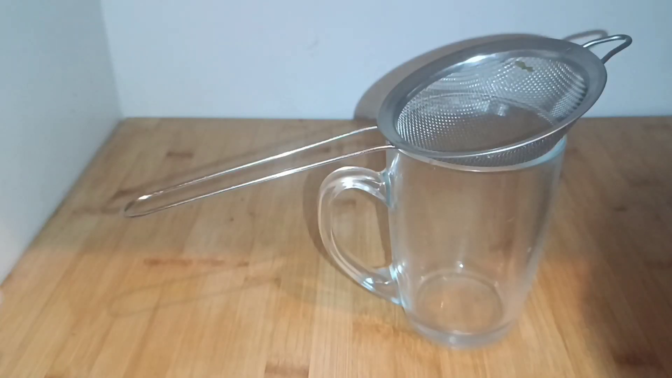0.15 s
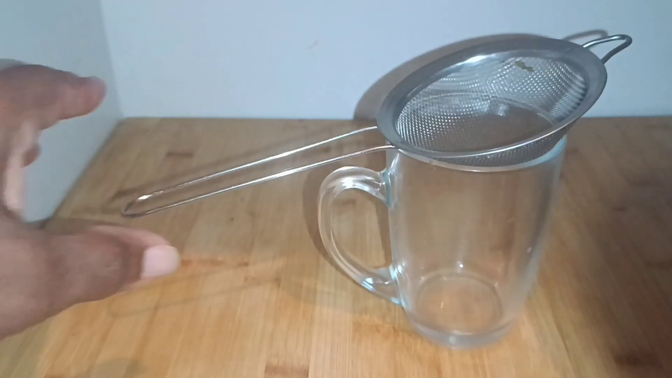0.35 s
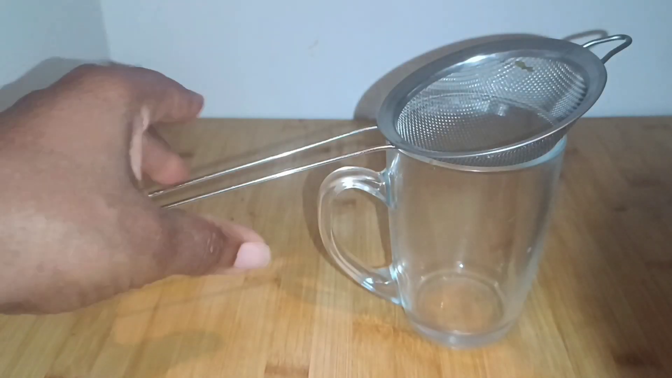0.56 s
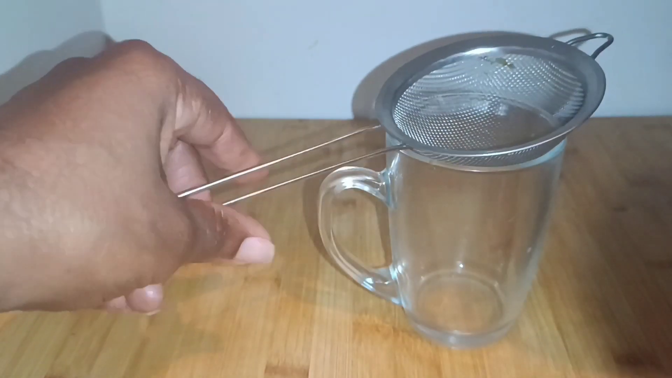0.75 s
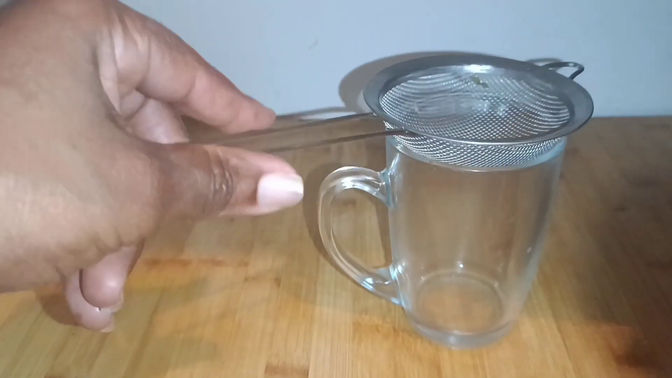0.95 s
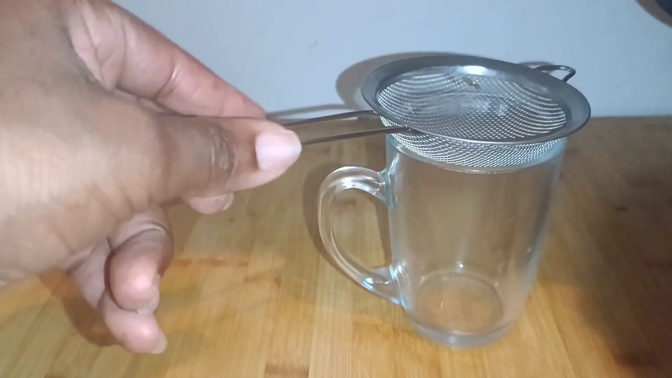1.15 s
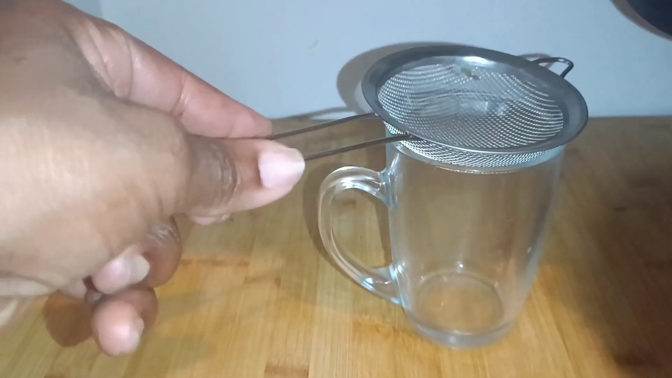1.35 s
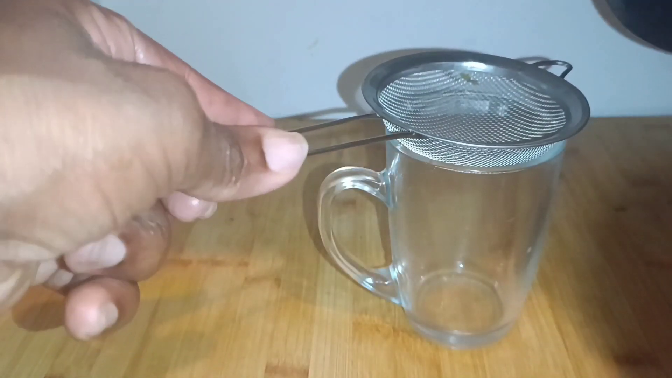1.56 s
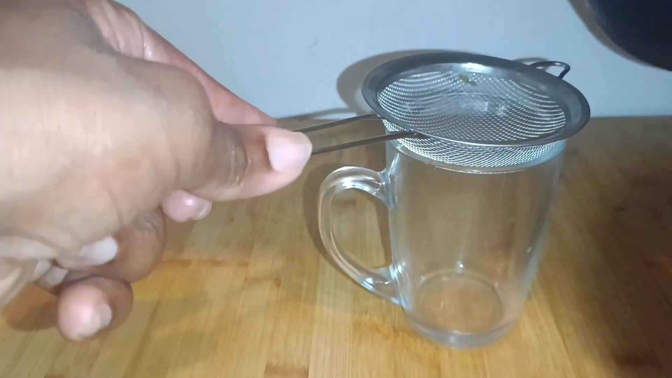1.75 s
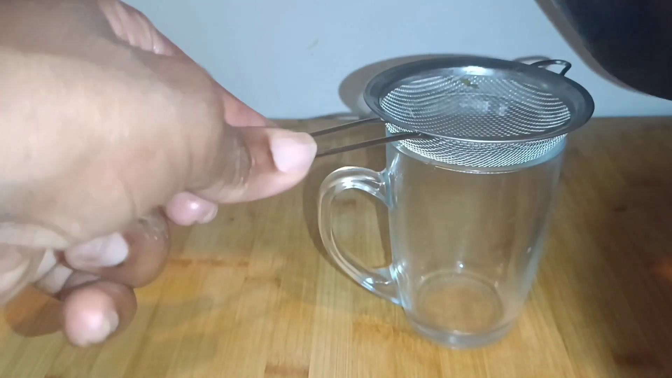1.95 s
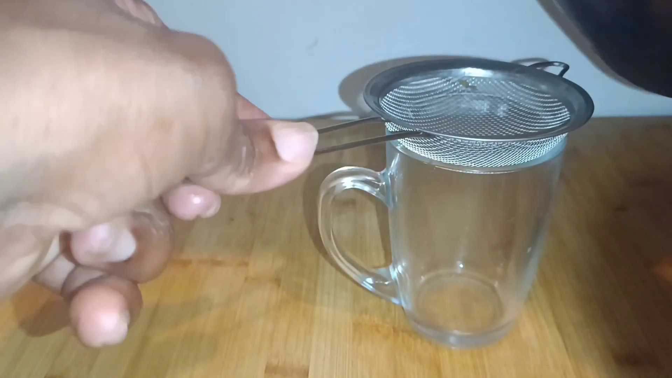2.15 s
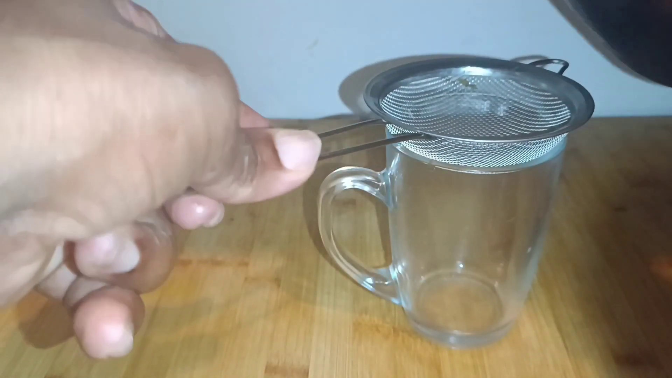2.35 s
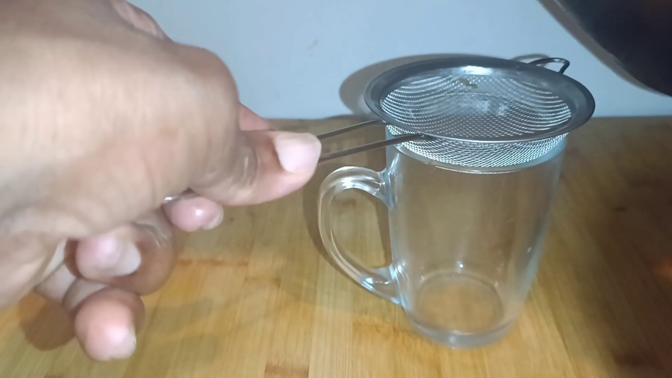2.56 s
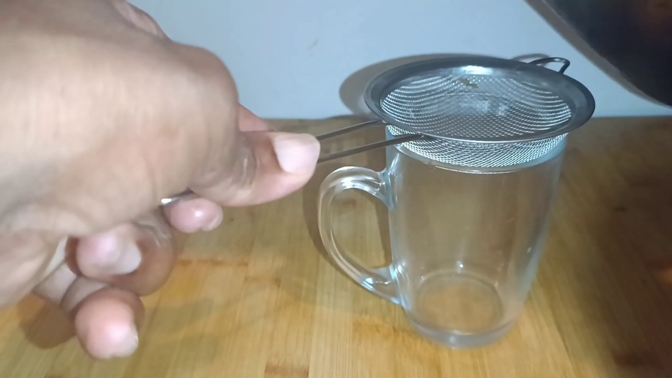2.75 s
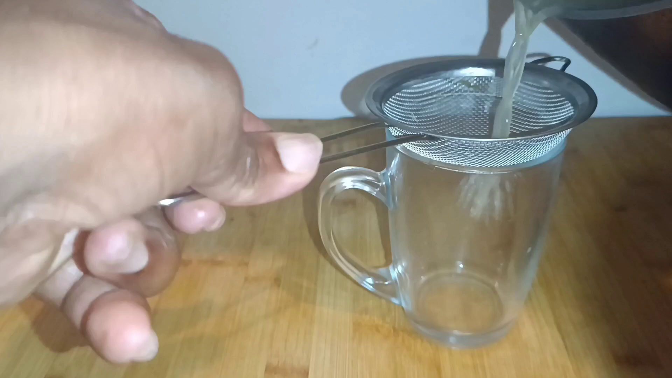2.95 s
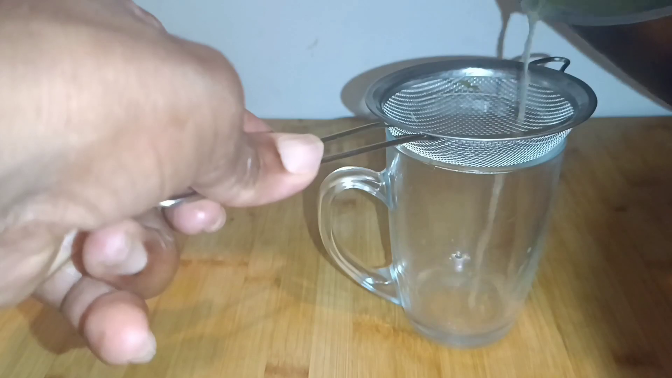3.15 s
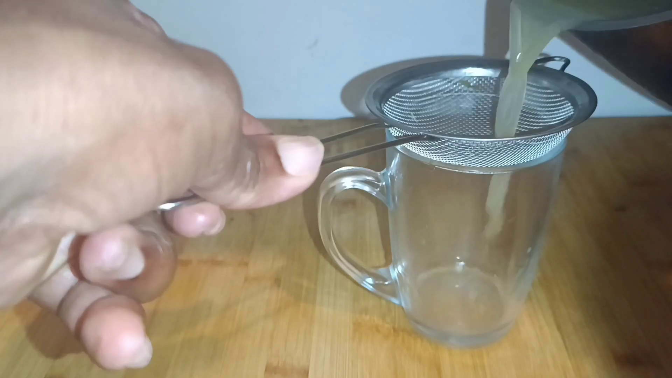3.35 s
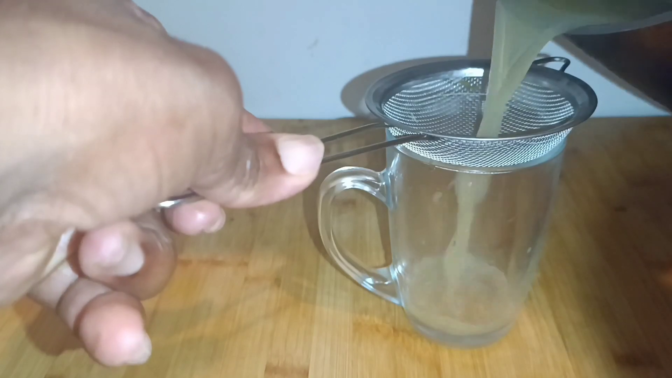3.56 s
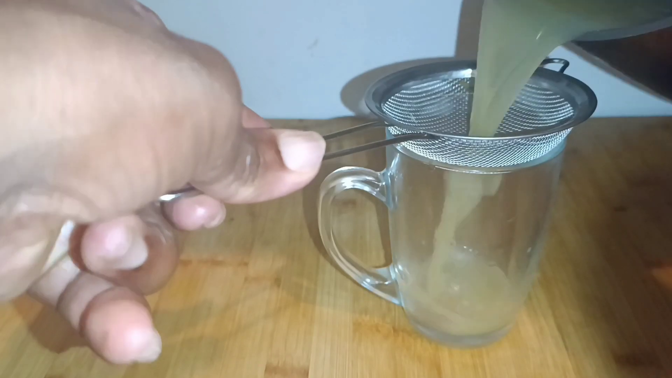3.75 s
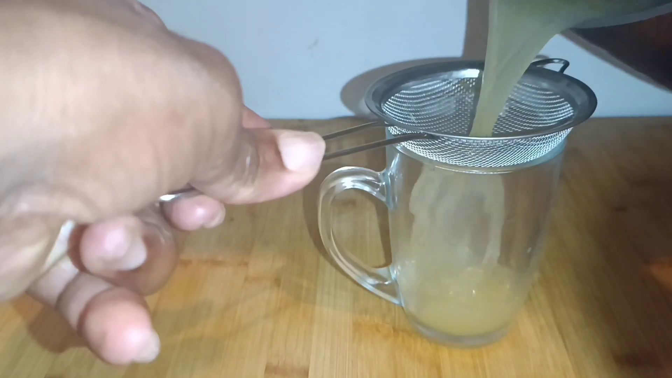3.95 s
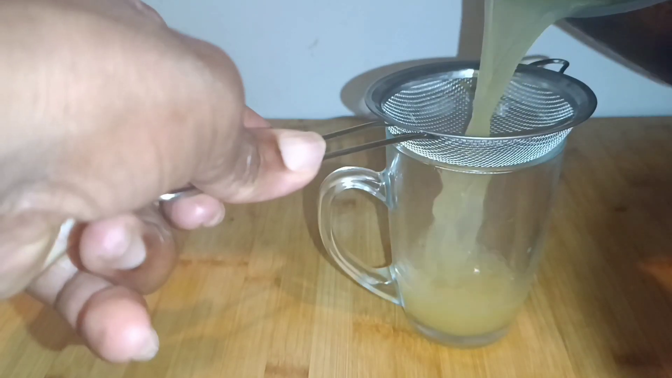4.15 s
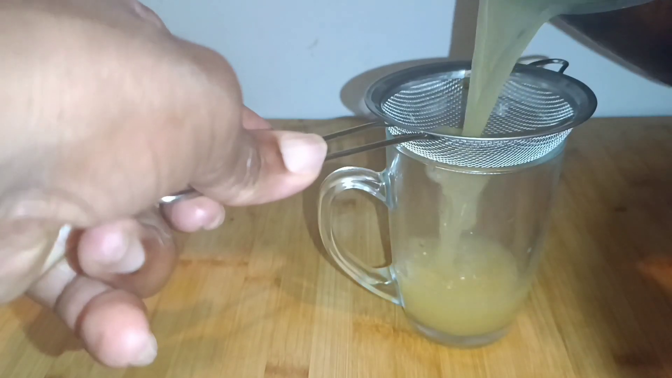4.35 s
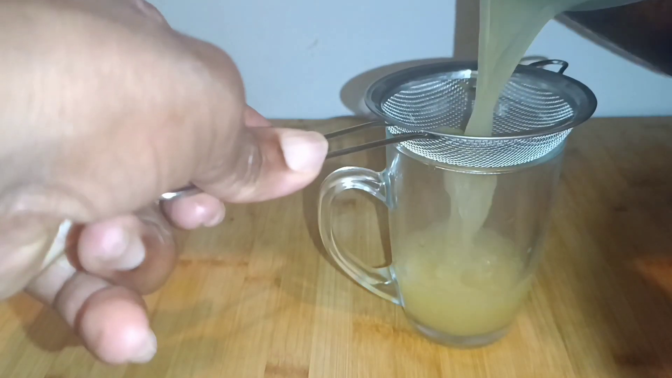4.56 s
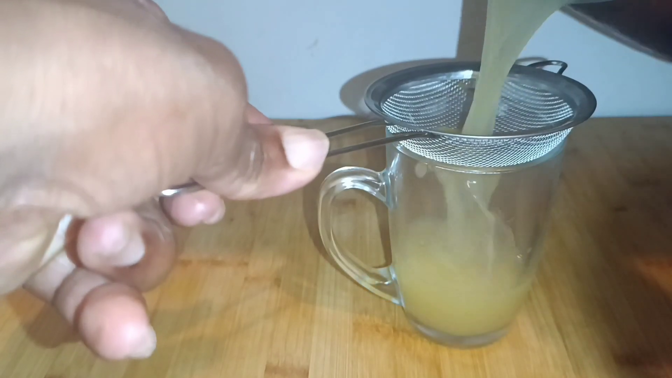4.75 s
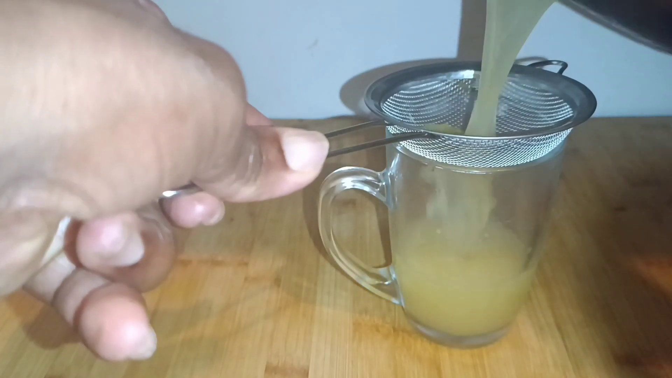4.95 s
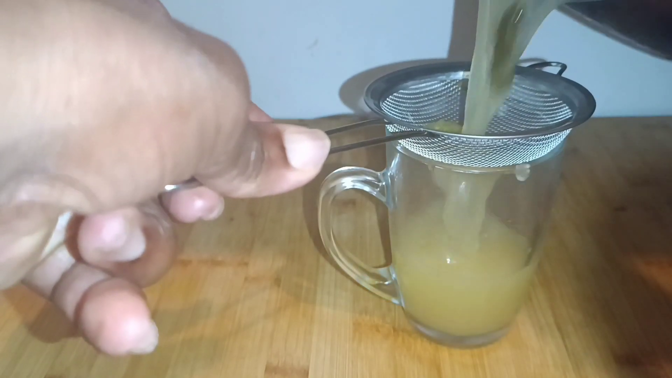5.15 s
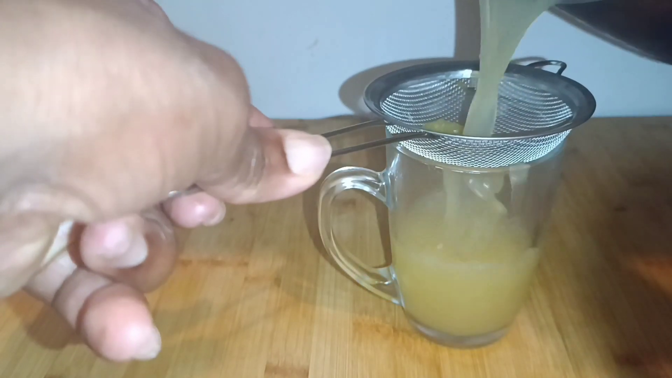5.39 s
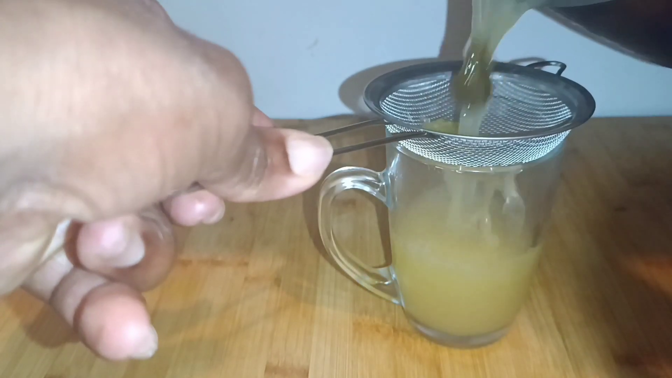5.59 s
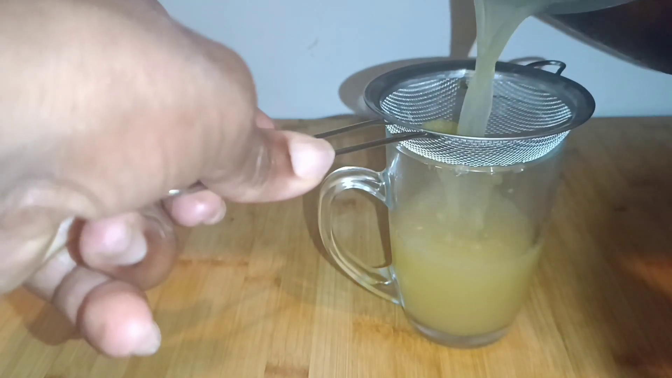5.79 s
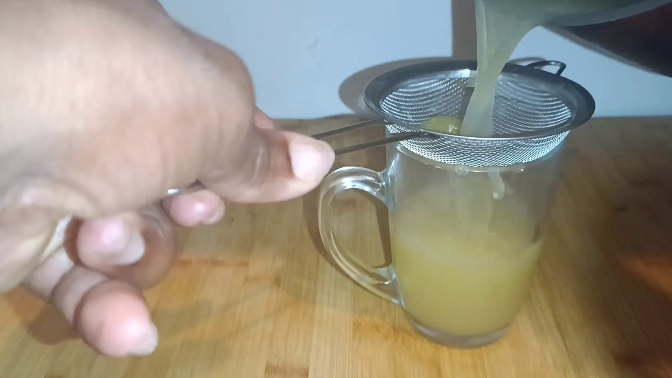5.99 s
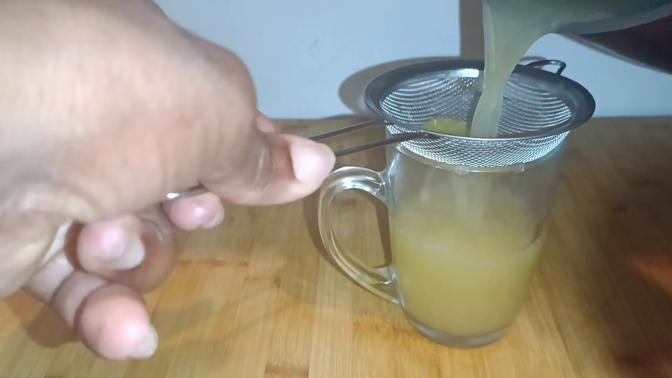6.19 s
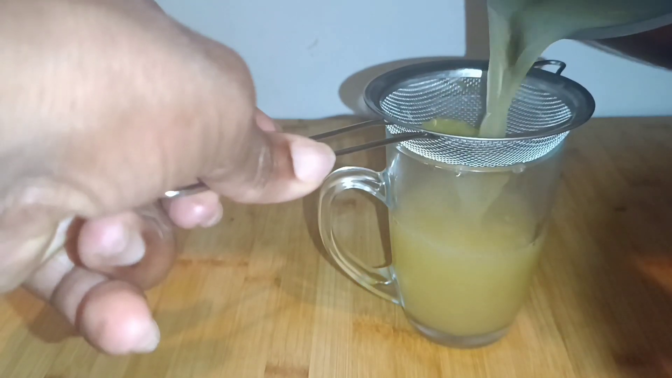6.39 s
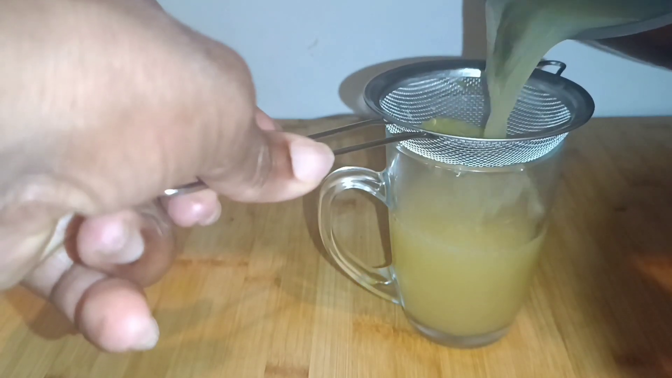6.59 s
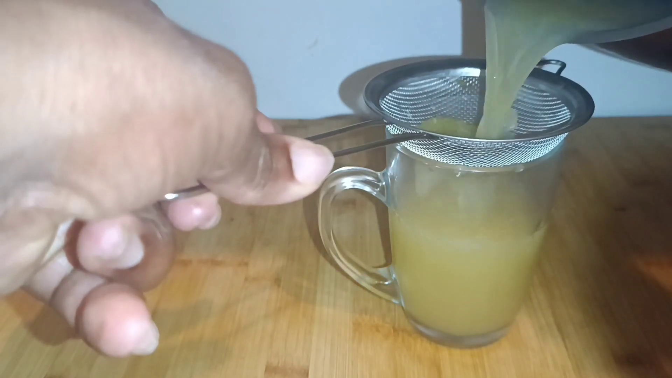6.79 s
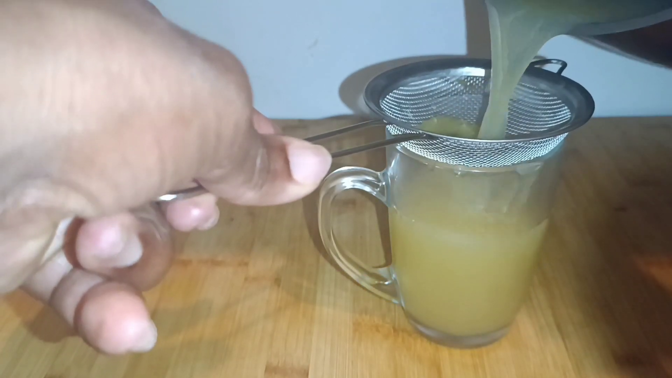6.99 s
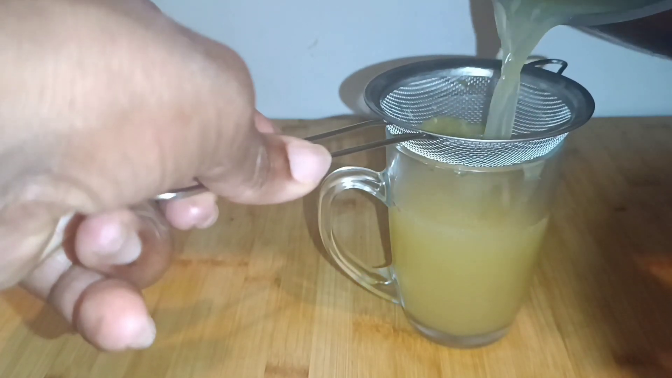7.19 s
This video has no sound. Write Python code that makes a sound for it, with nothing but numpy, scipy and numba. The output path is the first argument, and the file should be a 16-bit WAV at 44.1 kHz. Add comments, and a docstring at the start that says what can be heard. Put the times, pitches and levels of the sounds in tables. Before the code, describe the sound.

Metal sieve shifts on a glass rim with dry knocks and table rumble, then liquid gurgles into the mug, pitch sinking, ending in small drips.

```python
"""A small kitchen, close stereo microphone: a wire strainer shifts on the rim of a glass mug on a wooden table.
Stick-slip clicks keep the metal singing and the mug and table rumbling; dry knocks fall in between.
Then tea runs from a saucepan through the mesh: filtered swarms of clicks make spray and fizz, decaying sines
make bubbles and plops, and gliding resonances sound the frothy liquid, sinking first and later creeping up.
The pour thins to single plops. Short echoes and a steady room hush surround it."""
import sys
import numpy as np
from scipy import signal
from scipy.fft import rfft, irfft
from scipy.io import wavfile
from scipy.ndimage import uniform_filter1d
from numba import njit

SR = 44100
rng = np.random.default_rng(int(sys.argv[2]) if len(sys.argv) > 2 else 0)


def bounce(signal):
    """Save signal as a 16-bit WAV file at the path given by the first command-line argument."""
    frames = np.transpose(np.atleast_2d(signal))
    limited = np.clip(frames, -1, 1)
    pcm = np.round(limited * 32767).astype(np.int16)
    wavfile.write(sys.argv[1], SR, pcm)


N = 318843
TIME = np.arange(N) / SR
CUTOFF_HZ = 14600

# how far sounds from the mug lean to the left port: (frequency [Hz], left-right level [dB])
SHADE = [(100, 43), (500, 6), (850, -2), (1300, 4.5), (2400, 15.5), (4400, 10.5), (8000, 48.5), (14000, 28)]
# mug rocking on its base: (frequency [Hz], relative level [dB], t60 [s])
GLASS = [(376, -32.5, 0.048), (492.6, -27.5, 0.31), (902, -27, 0.028)]
# the stream: (time [s], relative churning [dB], relative fizz [dB], relative spray [dB])
POUR = [(3.44, -102, -70, -77), (3.56, -99, -86, -74), (3.665, -65, -74, -63.5), (3.71, -56, -56.5, -50.5),
        (3.87, -56, -49, -60), (3.99, -30, -34.5, -48), (4.13, -43, -37, -50.5), (4.413, -39.5, -52.5, -59),
        (4.8, -46.5, -53, -60), (5.18, -61, -55.5, -72), (5.33, -68, -65.5, -73), (5.54, -58, -91, -66),
        (5.729, -88, -75, -82), (6.12, -59.5, -90, -75.5), (6.34, -77, -82, -83.5),
        (6.88, -90, -88.5, -85.5), (7.23, -64, -80, -80)]
# gouts of tea hitting the surface: (time [s], plop level [dB], relative splash [dB], relative spray [dB])
GOUTS = [(3.544, -84, -42.5, -51.5), (3.679, -55, -38, -41.5), (3.705, -50, -40, -49),
         (3.718, -49, -56, -59), (3.799, -64, -31.5, -52), (3.839, -80, -38, -43), (3.89, -47, -18, -45),
         (3.956, -61, -16.5, -42.5), (4.008, -18, -21.5, -43), (4.022, -38, -20.5, -40),
         (4.074, -37, -21, -57), (4.131, -39.5, -22, -41), (4.2, -37, -31, -42), (4.228, -24.5, -23, -47),
         (4.286, -15, -25, -38.5), (4.327, -17, -22.5, -41.5), (4.351, -31, -38, -56),
         (4.388, -38, -53, -69), (4.414, -35.5, -26.5, -44.5), (4.425, -23, -37, -57),
         (4.453, -28, -29, -53), (4.48, -32.5, -37, -47), (4.515, -36, -34, -50), (4.535, -27.5, -30, -60),
         (4.633, -33, -35, -43.5), (4.683, -50, -24, -48), (4.714, -26.5, -25, -33.5),
         (4.73, -30.5, -30, -44), (4.772, -46, -30, -62), (4.784, -46, -53, -77), (4.914, -62, -24.5, -59),
         (4.965, -48, -25, -41), (4.985, -42.5, -23.5, -34.5), (5.018, -46.5, -32, -45.5),
         (5.041, -43, -31.5, -49), (5.158, -31, -31, -43), (5.203, -46, -57, -78), (5.24, -48.5, -39, -82),
         (5.288, -42, -38, -74), (5.389, -38, -45, -73), (5.442, -40.5, -47, -59), (5.501, -40, -31, -48),
         (5.516, -42, -36, -69), (5.624, -45.5, -46, -52.5), (5.706, -40, -53.5, -65),
         (5.885, -41, -58, -50.5), (5.931, -39, -52, -49), (6.065, -56, -40, -41),
         (6.095, -30.5, -35.5, -70), (6.142, -33, -56, -43.5), (6.185, -60, -66, -75),
         (6.437, -53, -50.5, -82.5), (6.572, -44, -44, -59), (6.767, -47.5, -43.5, -55.5),
         (6.814, -50.5, -50, -62), (6.861, -55.5, -64, -84), (7.068, -42.5, -65, -61),
         (7.165, -74, -63, -62)]
# resonances of the frothy liquid and the air above it: (time [s], first [Hz], second [Hz], third [Hz])
LIQUID = [(3.6, 2120, 2520, 3630), (3.85, 1507, 2290, 3400), (4.02, 1302, 2600, 3270),
          (4.116, 845, 1526, 2600), (4.299, 818, 1434, 2600), (4.502, 762, 1414, 2180),
          (4.718, 647.4, 1190, 1710), (4.998, 498, 1075, 1850), (5.401, 444.6, 1133, 1623),
          (5.7, 458, 1057, 1790), (5.952, 492.5, 1086, 1680), (6.152, 511, 1135, 1597),
          (6.6, 584, 1258, 1735), (7.203, 593, 1297, 1682)]


def from_db(db):
    """Decibels as an amplitude gain."""
    return 10 ** (np.asarray(db) / 20)


def rms_one(x):
    """Scales a signal to rms 1."""
    return x / np.sqrt(np.mean(x ** 2) + 1e-20)


def at_hz(points, hz):
    """Reads a spectrum of (Hz, dB) points, straight over log frequency."""
    return np.interp(np.log(hz), np.log(np.array(points)[:, 0]), np.array(points)[:, 1])


def gains(rows):
    """The dB columns of a curve as gains in time, silent outside it."""
    s, *columns = np.transpose(rows)
    return [from_db(np.interp(TIME, s, c, left=-150, right=-150)) for c in columns]


def band(x, low_hz, high_hz):
    """Keeps the band between two frequencies."""
    sos = signal.butter(2, [low_hz, min(high_hz, .45 * SR)], "band", fs=SR, output="sos")
    return signal.sosfilt(sos, x + 1e-18)


def pan(lean_db):
    """Left and right gains of mean power 1."""
    return rms_one(from_db(np.array([[lean_db], [-lean_db]]) / 2))


def ring(x, hz, t60):
    """A decaying mode; a unit click rings with height about 1."""
    r, w = from_db(-60 / (t60 * SR)), 2 * np.pi * hz / SR
    numerator, denominator = [np.sin(w) / 2, 0, -np.sin(w) / 2], [1, -2 * r * np.cos(w), r * r]
    return signal.lfilter(numerator, denominator, x + 1e-18) / np.sin(w)


def clicks(per_s, spread_db):
    """Random tiny impacts of either sign, their sizes scattered exponentially in dB."""
    sizes = from_db(spread_db * np.minimum(rng.exponential(1, N), 4)) * rng.choice([-1, 1], N)
    return sizes * (rng.random(N) < per_s / SR)


def evened(x, seconds):
    """Slow swells are taken out, the fast grain stays; rms about 1."""
    power = np.mean(np.atleast_2d(x) ** 2, axis=0)
    return x / np.sqrt(np.abs(uniform_filter1d(power, int(seconds * SR))) + 1e-4 * power.mean())


def bursts(times, levels_db, rise_s, t60):
    """Envelope of quick blows that die away."""
    power, age = np.zeros(N + SR), np.arange(SR // 4) / SR
    for s, db in zip(times, levels_db):
        blow = from_db(db - 60 * age / t60) * (1 - np.exp(-age / rise_s))
        power[int(s * SR):][:len(age)] += blow ** 2
    return np.sqrt(power[:N])


def held(rows, attack_s, release_s):
    """Envelope of strokes (start, end, dB) that swell, hold and die away, 60 dB per attack or release time."""
    power = 0
    for start, end, db in rows:
        drop = np.maximum((start - TIME) / attack_s, (TIME - end) / release_s)
        power = power + from_db(db - 60 * np.clip(drop, 0, 3)) ** 2
    return np.sqrt(power)


def add(out, s, sound):
    """Mixes a short stereo sound in at s seconds."""
    start = int(s * SR)
    out[:, start:start + sound.shape[1]] += sound


def lean(s, hz):
    """Left-right dB of a sound from inside the mug."""
    # the treble leans further left as the mug fills: (time [s], added left-right level [dB])
    lean_shift = [(4.0, 1.5), (4.8, 5.5), (5.6, 21)]
    return at_hz(SHADE, hz) + np.interp(s, *np.transpose(lean_shift)) * (hz > 900)


@njit
def gliding_mode(x, w, r):
    """A resonance whose pitch w (radians a sample) and damping r move."""
    out, state = np.zeros(len(x)), 0j
    for i in range(len(x)):
        state = state * r[i] * np.exp(1j * w[i]) + x[i]
        out[i] = state.real
    return out


def moving_tone(hz, sharpness, even_s):
    """Dense clicks keep one gliding resonance sounding at a steady strength; rms about 1."""
    w = 2 * np.pi * hz / SR
    push = np.diff(clicks(3000, 1.45), prepend=0)
    return evened(gliding_mode(push, w, np.exp(-w / (2 * sharpness))), even_s)


def rubbed(modes, slips_per_s, spread_db, shade):
    """Stick-slip clicks keep the modes of a body ringing."""
    slips = clicks(slips_per_s, spread_db)
    out = 0
    for hz, db, t60 in modes:
        voice = rms_one(ring(slips * rng.normal(1, 0.36, N), hz, t60))
        out = out + from_db(db) * voice * pan(shade * at_hz(SHADE, hz))
    return out


def grains(spectrum, per_s, cycles, spread_db):
    """A swarm of tiny bubbles or ticks, dealt to pitches that come and go in patches; rms about 1."""
    patch_s, patchy_db = .04, 5   # each pitch flares or sinks for this long, by about this much
    born, dealt, out = clicks(per_s, spread_db), rng.integers(0, 24, N), 0
    patches = from_db(patchy_db * rng.standard_normal((512, 24)))
    born = born * patches[(TIME / patch_s).astype(int) % len(patches), dealt]
    for k, hz in enumerate(np.geomspace(spectrum[0][0], spectrum[-1][0], 24)):
        voice = rms_one(ring(born * (dealt == k), hz, cycles / hz))
        out = out + from_db(at_hz(spectrum, hz)) * voice * pan(at_hz(SHADE, hz) + rng.normal(0, 4.4))
    return evened(band(out, spectrum[0][0], spectrum[-1][0] * 2.3), 0.074)


def room_noise():
    """The steady hush of the kitchen: shaped noise, most alike at both ports in the deep bass and the top."""
    # colour of the hush: (frequency [Hz], relative level [dB])
    hush = [(15, -56), (25, -22), (92, -3.5), (184, -5.5), (247, -5), (267, -4), (349, -9.5), (520, -12),
            (610, -13), (886, -20.5), (959, -21), (1190, -23.5), (2310, -22.5), (3350, -30), (14500, -47.5)]
    # how alike the ports hear it: (frequency [Hz], left-right likeness [0-1])
    likeness = [(60, 0.74), (180, 0.72), (400, 0.025), (9000, 0.036), (15000, 0.9)]
    quiet_db = -66.5
    hz = np.maximum(np.fft.rfftfreq(N, 1 / SR), 1)
    mid, side = rfft(rng.standard_normal((2, N))) * from_db(at_hz(hush, hz))
    alike = np.clip(at_hz(likeness, hz), 0, 1)
    both = np.sqrt(1 + alike) * mid + np.sqrt(1 - alike) * side * [[1], [-1]]
    return from_db(quiet_db) * rms_one(irfft(both, N))


def kitchen(x, near_db, tail_db, t60, treble_t60):
    """Quick echoes from the table and the corner walls, then a short tail with its own treble decay."""
    age = np.arange(SR // 2) / SR
    out = []
    for side in x + from_db(-8.5) * band(x[::-1], 400, 3500):
        near = rng.normal(0, 1, len(age)) * (rng.random(len(age)) < 2500 / SR)
        near = near * (age > .0012) * from_db(-60 * age / 0.028)
        near = band(near, 970, 21000)   # small surfaces reflect only short waves
        noise = rng.normal(0, 1, len(age)) * (age > .006)
        tail = band(noise, 410, 4900) * from_db(-60 * age / t60)
        tail = tail + from_db(-1.0) * band(noise, 7500, 11000) * from_db(-60 * age / treble_t60)
        echoes = from_db(near_db) * near / np.linalg.norm(near) + from_db(tail_db) * tail / np.linalg.norm(tail)
        out.append(signal.fftconvolve(side, echoes)[:N])
    return x + np.array(out)


def rustle():
    """The hand moves in and rubs along the handle: band-passed clicks make a faint, soft hiss."""
    # the hand brushing past: (start [s], end [s], level [dB])
    rustles = [(0.06, 0.3, -79), (0.33, 0.47, -76), (1.55, 1.62, -69)]
    skin = rms_one(np.array([band(clicks(3000, 7.3), 1180, 2550) for _ in range(2)]))
    return held(rustles, attack_s=0.31, release_s=0.14) * skin * pan(4.4)


def table_boom():
    """The heavy board passes only the bass of what shakes the mug, a little differently to each side; rms about 1."""
    # table top: (frequency [Hz], relative level [dB], t60 [s])
    board = [(92, -19.5, 0.1), (117, 2.5, 0.22), (147, 7, 0.1), (175.5, -2, 0.057), (208.3, 8, 0.16),
             (280, -8.5, 0.25)]
    mid, side = (rubbed(board, slips_per_s=230, spread_db=1.5, shade=0) for _ in range(2))
    both = mid + from_db(-10.0) * side * [[1], [-1]]
    return evened(band(band(both, 100, 170), 60, 390), 0.035)


def shoves():
    """Each shove swells and fades evenly in dB; the judder pitch is their power-weighted mean: (gain, Hz)."""
    # the strainer pushed over the rim:
    # (time of peak [s], swell [s], fade [s], relative rumble level [dB], judder pitch [Hz])
    pushes = [(0.816, 0.15, 0.21, -37.5, 150), (0.875, 0.051, 0.12, -42.5, 118),
              (1.011, 0.094, 0.13, -26.5, 151.5), (1.059, 0.099, 0.068, -30.5, 200),
              (1.105, 0.072, 0.19, -37, 184), (1.21, 0.035, 0.22, -46, 206), (1.268, 0.08, 0.11, -47, 195),
              (1.42, 0.26, 0.11, -52, 148), (1.488, 0.11, 0.082, -29.5, 177), (1.54, 0.089, 0.13, -47, 294),
              (1.665, 0.069, 0.099, -30, 152), (1.735, 0.1, 0.25, -45, 153),
              (1.926, 0.055, 0.073, -36.5, 203), (2.006, 0.16, 0.1, -37.5, 195),
              (2.989, 0.097, 0.095, -43, 193)]
    range_db = 35.5   # change of level over one swell or fade time
    power, weighted_hz = 0, 0
    for s, swell_s, fade_s, db, hz in pushes:
        drop = np.maximum((s - TIME) / swell_s, (TIME - s) / fade_s)
        own = from_db(db - range_db * np.clip(drop, 0, 10)) ** 2
        power, weighted_hz = power + own, weighted_hz + own * hz
    return np.sqrt(power), weighted_hz / power


def judder(hz):
    """The mug stutters over the board: a low gliding resonance groans; rms about 1."""
    groan = moving_tone(hz, sharpness=6.6, even_s=0.027)
    return evened(band(band(groan, 75, 302), 65, 350), 0.0202)


def strainer(boom):
    """The rim of the strainer grates on the glass and sings; the mug passes the shudder into the table."""
    # strainer modes: (frequency [Hz], relative level [dB], t60 [s])
    wire_modes = [(1940, -5, .3), (2096, 4, .5), (4188, -15, .35), (4864, 2.5, .45), (5690, -5.5, .3),
                  (6853, 0, .22), (8366, -14, .3), (8660, -10, .12), (9335, -8, .1), (9700, -11, .06),
                  (10070, -7, .1), (11250, -19, .05), (11630, -13, .1), (13100, -17, .05)]
    # the wire slides on the rim and sings: (start [s], end [s], level [dB])
    slides = [(0.728, 0.91, -61.5), (0.757, 0.80, -59.5), (0.945, 1.06, -56.5), (0.972, 0.995, -56),
              (1.08, 1.17, -66), (1.355, 1.42, -67.5), (1.44, 1.485, -59.5), (1.615, 1.68, -58.5),
              (1.765, 1.78, -69), (1.885, 1.9, -58), (1.945, 1.99, -62.5), (2.917, 2.925, -62),
              (2.95, 2.98, -61.5)]
    glass = band(rubbed(GLASS, slips_per_s=440, spread_db=0.5, shade=0.26), 220, 1770)
    wire = 0
    for mode in wire_modes:
        voice = evened(rubbed([mode], slips_per_s=1500, spread_db=5.0, shade=0.96), 0.11)
        wire = wire + from_db(mode[1]) * voice
    # the lowest modes follow the shudder
    hum = evened(rubbed(wire_modes[:2], slips_per_s=1100, spread_db=2.5, shade=1.0), 0.03)
    push, judder_hz = shoves()
    shudder = from_db(-2.0) * judder(judder_hz) + from_db(-3.5) * boom
    shudder = shudder + from_db(-9.5) * glass + from_db(-23.0) * band(hum, 1987, 2176)
    metal = held(slides, attack_s=0.024, release_s=0.077) * rms_one(wire)
    return band(push * shudder, 42, 7200) + metal


def knocks():
    """Short dry clacks of steel on glass that rock the mug, and one faint tap near the start."""
    # strainer on glass: (time [s], relative clack of the steel [dB], relative clunk of the mug [dB])
    blows = [(0.754, -42, -34.5), (0.971, -26, -26.5), (0.985, -35, -44), (1.035, -43.5, -49),
             (1.456, -39, -41.5)]
    # colour of the clack: (frequency [Hz], relative level [dB])
    clack_colour = [(400, 7.5), (560, -10), (900, -11), (1400, -4), (2000, 1), (3000, -7), (5000, -38),
                    (9500, -4), (14000, -8)]
    # the light tap: (frequency [Hz], relative level [dB], t60 [s])
    tap_modes = [(686, -7, 0.14), (3600, -12.5, 0.015)]
    clack = grains(clack_colour, per_s=9100, cycles=51, spread_db=2.5)
    clunk = evened(rubbed(GLASS, slips_per_s=700, spread_db=5.5, shade=0.36), 0.014)
    tap = evened(rubbed(tap_modes, slips_per_s=500, spread_db=5.5, shade=0), 0.081)
    s, clack_db, clunk_db = np.transpose(blows)
    steel = from_db(-8.5) * bursts(s, clack_db, rise_s=0.0059, t60=0.088) * clack
    mug = from_db(-6.5) * bursts(s, clunk_db, rise_s=0.0098, t60=0.12) * clunk
    return steel + mug + bursts([.086], [-55], rise_s=0.0023, t60=0.16) * band(tap, 500, 4400)


def mesh_drops():
    """Stray drops burst on the wire mesh in a bright tick."""
    # drops ticking on the mesh: (time [s], level [dB])
    drops = [(3.083, -60), (3.133, -54), (3.327, -57), (3.357, -44.5), (3.47, -54), (3.544, -60),
             (3.621, -60), (3.819, -41), (5.118, -47), (5.308, -54), (5.744, -59), (5.767, -55.5),
             (6.063, -45), (6.24, -61), (6.53, -61), (6.918, -62), (7.036, -54), (7.078, -63.5)]
    # colour of the tick: (frequency [Hz], relative level [dB])
    tick_colour = [(4500, 1), (6800, 0.5), (8200, 4), (10200, 15), (14000, -5)]
    tick = grains(tick_colour, per_s=630, cycles=61, spread_db=4)
    return bursts(*np.transpose(drops), rise_s=0.0035, t60=0.071) * tick


def liquid(sharpness, second_db, third_db, wander):
    """Churning sounds the mug's gliding resonances; the lowest weakens as the tea rises. Rms about 1."""
    s, *tracks = np.transpose(LIQUID)
    first_db = np.interp(TIME, [4.5, 5.4, 6.0, 7.0], [8.0, -3.0, -2.5, -14.5])
    out = 0
    for track, level_db in zip(tracks, [first_db, second_db, third_db]):
        froth = np.interp(TIME, np.arange(300) / 40, rng.normal(0, 1, 300))
        hz = np.interp(TIME, s, track) * np.exp(wander * froth)   # the share of air in the froth keeps changing
        w, lean_db = 2 * np.pi * hz / SR, lean(TIME, hz)
        tone = evened(gliding_mode(clicks(2500, 3.4), w, np.exp(-w / (2 * sharpness))), 0.02)
        sides = from_db([lean_db / 2, -lean_db / 2])
        out = out + from_db(level_db) * tone * sides / np.sqrt(np.mean(sides ** 2, axis=0))
    return evened(band(out, 440, 2900), 0.02)


def gulp_db():
    """Relative level of the frothy gulp around each plop."""
    # gulp against plop: (time [s], level relative to the plop column [dB])
    gulp = [(4.3, -6.5), (4.75, 11), (5.0, 11), (5.2, 6), (5.4, -1.5), (6.1, -5.5), (6.6, 6)]
    s, plop_db, _, _ = np.transpose(GOUTS)
    return plop_db + np.interp(s, *np.transpose(gulp))


def mug_ring():
    """After each splash the hollow of the mug rings on, more clearly once the first rush is over."""
    # cross modes of the air in the mug: (frequency [Hz], relative level [dB], t60 [s])
    air_modes = [(2590, -6.5, 0.57), (3180, -11, 0.14), (3630, -9.5, 0.13)]
    # the mug's higher modes: (frequency [Hz], relative level [dB], t60 [s])
    treble_modes = [(4700, -7.5, 0.064), (4850, 4, 0.1), (6182, 3, 0.14), (7130, -5.5, 0.077),
                    (7000, -19.5, 0.058), (9370, 4.5, 0.0077), (11800, -7, 0.025)]
    s, _, splash_db, spray_db = np.transpose(GOUTS)
    clear = from_db(np.interp(TIME, [4.6, 5.4], [-9, 0]))
    hollow = liquid(sharpness=180, second_db=-4.0, third_db=-18.0, wander=0.02)
    hollow = bursts(s, gulp_db(), rise_s=0.0064, t60=0.13) * hollow
    cross = evened(rubbed(air_modes, slips_per_s=2000, spread_db=-7.0, shade=0.97), 0.023)
    cross = bursts(s, splash_db, rise_s=0.0011, t60=0.11) * cross
    treble = evened(rubbed(treble_modes, slips_per_s=12000, spread_db=15.0, shade=0.91), 0.019)
    treble = bursts(s, spray_db, rise_s=0.002, t60=0.049) * treble
    upper = from_db(-14.0) * band(cross, 2200, 4900) + from_db(0.5) * band(treble, 3300, 11000)
    return clear * (from_db(-9.0) * hollow + upper)


def mug_hum():
    """The stream keeps the air above the tea humming, in uneven gurgles."""
    # the hum under the stream: (time [s], level [dB])
    hum = [(4.7, -51), (4.92, -68), (4.98, -48.5), (5.06, -51), (5.13, -61.5), (5.2, -55.5), (5.35, -65),
           (5.4, -50.5), (5.48, -62.5), (5.7, -79.5), (6.2, -70)]
    s, first_hz, _, _ = np.transpose(LIQUID)
    level, = gains(hum)
    tone = moving_tone(np.interp(TIME, s, first_hz) * 0.97, sharpness=25.0, even_s=0.036)
    gurgle = from_db(5.0 * np.interp(TIME, np.arange(300) / 40, rng.uniform(-1.7, 1.7, 300)))
    return level * rms_one(gurgle * band(tone, 264, 906)) * pan(2.5)


def dribbles():
    """Uneven little dribbles off the mesh land beside the stream, each a short gurgle of ringing bubbles."""
    # strength of the dribbles: (time [s], relative level [dB])
    strength = [(3.703, -48), (4.05, -42), (4.35, -43.5), (4.8, -58), (5.35, -42.5), (5.6, -57),
                (6.15, -61.5), (6.402, -64.5), (7.2, -73.5)]
    # colour of their bubbles: (frequency [Hz], relative level [dB])
    gurgle_colour = [(1400, -8), (2000, -7), (2700, 5.5), (3500, -5), (4500, -4), (6200, 4)]
    rate_per_s, spread_db = 36, 9.5   # the rate sets the waits before their random stretch
    times, strength_db = np.transpose(strength)
    wait, size = rng.random((200, 2)).T
    s = times[0] + np.cumsum(0.28 + 1.1 * wait) / rate_per_s
    db = np.interp(s, times, strength_db) - spread_db * size
    falls = bursts(s[s < times[-1]], db[s < times[-1]], rise_s=0.0069, t60=0.082)
    gurgle = grains(gurgle_colour, per_s=1200, cycles=240, spread_db=6.5)
    froth = liquid(sharpness=120, second_db=5.5, third_db=-0.5, wander=0.062)
    return from_db(1) * falls * (gurgle + from_db(-1.5) * froth)


def strays():
    """Small bubbles come by chance, denser and louder the stronger the stream: rows (s, Hz, peak dB, t60 s)."""
    per_s, level_db, spread_db = 79, 0.5, 1   # rate at full flow; level against the fizz column of the stream
    low_hz, high_hz = 943, 4850
    thinning = .24   # dB of bubble rate lost per dB of weaker stream
    t60_at_1khz, ring_shortens = 0.053, 0.67   # ring time [s]; it falls with pitch to this power
    times, _, fizz_db, _ = np.transpose(POUR)
    wait, size, strength, luck = rng.random((700, 4)).T
    s = times[0] + np.cumsum(-np.log(1 - wait)) / per_s
    flow_db = np.interp(s, times, fizz_db)
    born = (s < times[-1]) & (luck < from_db(thinning * (flow_db - fizz_db.max())))
    hz = low_hz * (high_hz / low_hz) ** size
    db = flow_db + level_db + spread_db * (2 * strength - 1)
    t60 = t60_at_1khz * (hz / 10 ** 3) ** -ring_shortens
    return list(np.transpose([s, hz, db, t60])[born])


def bubble(hz, t60, phase):
    """A bubble swells as it pinches off, then rings down while its pitch creeps up; envelope peak 1."""
    swell_cycles, pitch_rise = 2.9, 0.032   # the pitch rises by up to this share within its t60
    age = np.arange(SR // 8) / SR
    swell = 1 - np.exp(-(age / (swell_cycles / hz + 0.00079)) ** 2)
    shape = swell * from_db(-60 * age / t60)
    cycles = hz * (age + pitch_rise * np.minimum(age, t60) * age / (2 * t60))
    return shape / shape.max() * np.sin(2 * np.pi * (cycles + phase))


def bubbles():
    """Every bubble rings and sheds two weaker ones near its own pitch."""
    # the clearest bubbles, plus a few drops that ring clearly on the wire mesh: (time [s], frequency [Hz], peak
    # level [dB], t60 [s])
    clear_bubbles = [(3.359, 7270, -44, 0.01), (3.525, 1683, -53.5, 0.062), (3.676, 3720, -45.5, 0.036),
                     (3.679, 2186, -39.5, 0.057), (3.696, 3600, -33.5, 0.021), (3.717, 943, -38.5, 0.015),
                     (3.76, 1700, -42.5, .03), (3.768, 2260, -38.5, 0.016), (3.786, 3600, -37, .015),
                     (3.799, 1794, -34, 0.032), (3.893, 2170, -25.5, 0.016), (3.916, 1670, -27, 0.028),
                     (3.956, 2418, -19, 0.015), (3.956, 4620, -22.5, 0.0038), (3.993, 2840, -22, 0.013),
                     (4.008, 798, -26.5, 0.027), (4.01, 2330, -11, 0.0016), (4.03, 1440, -31, 0.11),
                     (4.075, 4850, -29.5, 0.021), (4.195, 2747, -25.5, 0.067), (4.228, 2440, -22, 0.026),
                     (4.413, 2840, -36, 0.028), (4.62, 3690, -42.5, 0.036), (4.731, 951, -30, 0.034),
                     (4.853, 1215, -37.5, 0.034), (4.91, 4270, -32.5, 0.054), (4.915, 4760, -37, 0.012),
                     (4.965, 1198, -37, 0.025), (4.982, 4030, -27.5, 0.011), (5.08, 1243, -46.5, 0.059),
                     (5.094, 2470, -35, 0.047), (5.12, 3060, -38, 0.036), (5.152, 3080, -39, 0.039),
                     (5.16, 515, -36, 0.092), (5.159, 1005, -30, 0.047), (5.242, 2660, -35.5, 0.02),
                     (5.288, 2600, -33, 0.016), (5.307, 1790, -43, 0.022), (5.334, 2590, -41, 0.05),
                     (5.389, 1560, -35, 0.011), (5.497, 1300, -44, 0.028), (5.498, 1654, -38, 0.034),
                     (5.502, 6880, -40, 0.01), (5.52, 4350, -38.5, 0.045), (5.626, 3110, -41, .03),
                     (5.626, 2530, -42.5, 0.046), (5.626, 4580, -38.5, 0.01), (5.654, 3000, -52, 0.053),
                     (5.708, 3050, -49, 0.027), (5.742, 4290, -50.5, 0.031), (5.81, 2770, -59, 0.055),
                     (5.825, 2130, -59, 0.069), (5.831, 3670, -43.5, 0.029), (5.884, 1690, -47, 0.016),
                     (5.935, 1680, -48, 0.05), (6.065, 4790, -39, 0.016), (6.094, 2535, -46.5, 0.032),
                     (6.142, 10600, -38, 0.0039), (6.145, 3310, -30.5, 0.0042), (6.212, 3220, -53, 0.015),
                     (6.251, 2650, -55.5, 0.058), (6.422, 2340, -61, 0.034), (6.45, 3560, -55, 0.019),
                     (6.555, 5780, -48, 0.046), (6.575, 1660, -50.5, 0.037), (6.61, 2760, -47.5, 0.014),
                     (6.769, 4970, -50, 0.042), (6.816, 9740, -54.5, 0.018), (6.858, 3240, -60, 0.024),
                     (6.769, 3030, -28.5, 0.025), (6.792, 2940, -39.5, 0.017), (6.826, 2956, -46.5, 0.027),
                     (6.991, 5820, -51, 0.035), (7.076, 6100, -48.5, 0.033), (7.109, 1290, -49, 0.035),
                     (7.169, 4670, -50, 0.038), (7.188, 1285, -56.5, 0.043)]
    shed_within_s, shed_loss_db = 0.041, 19.5   # range of the random wait; least loss of an offspring
    lean_spread_db = 5.5   # bubbles burst at different places in the mug, so each leans its own way
    out, rows = np.zeros((2, N + SR)), list(clear_bubbles) + strays()
    for (s, hz, db, t60), chance in zip(rows, rng.random((len(rows), 2, 3))):
        family = [(s, hz, db)]
        for wait, size, loss in chance:
            shed_hz = min(hz * 2 ** (1.094 * size - .4), CUTOFF_HZ)
            family.append((s + 0.0057 + shed_within_s * wait, shed_hz, db - shed_loss_db - 8 * loss))
        for start, pitch, peak_db in family:
            place = pan(lean(start, pitch) + lean_spread_db * rng.normal())
            add(out, start, from_db(peak_db) * bubble(pitch, t60, rng.random()) * place)
    return out[:, :N]


def plops():
    """Each gout traps a big bubble that swells at a resonance of the liquid and is choked as the hollow closes."""
    deep_until_s = 4.8   # plops ring at the first resonance until then, later at the second
    peak_s, swell_s, choke_s = 0.003246, 0.0027, 0.0059   # peak after the gout lands; rise and fall times
    times, first_hz, second_hz, _ = np.transpose(LIQUID)
    out, age = np.zeros((2, N + SR)), np.arange(-SR // 50, SR // 25) / SR
    shape = np.exp(-(age / np.where(age < 0, swell_s, choke_s)) ** 2)
    for (s, db, _, _), phase in zip(GOUTS, rng.random(len(GOUTS))):
        hz = np.interp(s, times, first_hz if s < deep_until_s else second_hz)
        tone = np.sin(2 * np.pi * (hz * age + phase))
        add(out, s + peak_s + age[0], from_db(db) * shape * tone * pan(lean(s, hz)))
    return out[:, :N]


def stream(boom):
    """Churning, fizz and spray follow the flow, with a flare of each when a gout of tea lands."""
    # colour of the fizz: (frequency [Hz], relative level [dB])
    fizz_colour = [(1200, -15), (1900, -7), (2500, -3), (3000, 6), (3600, -2.5), (4400, -5)]
    # colour of the spray: (frequency [Hz], relative level [dB])
    spray_colour = [(4000, -2.5), (4900, -6.5), (6200, 3.5), (8000, -9), (9800, -4), (12000, -12),
                    (14500, -16.5)]
    churn, fizz, spray = gains(POUR)
    s, _, splash_db, spray_db = np.transpose(GOUTS)
    fall = from_db(np.interp(TIME, [5.0, 5.7], [0, -5]))   # a shorter fall into the fuller mug throws less spatter
    gulps = from_db(-6.5) * bursts(s, gulp_db(), rise_s=0.0022, t60=0.05)
    froth = liquid(sharpness=16.7, second_db=-7.5, third_db=-15.5, wander=0.1)
    low = (from_db(-10.5) * churn + gulps) * froth
    mid = from_db(-12.5) * fizz * grains(fizz_colour, per_s=3500, cycles=64, spread_db=7.0)
    top = from_db(-3.5) * spray * grains(spray_colour, per_s=9000, cycles=210, spread_db=7.5)
    splash = from_db(-11.0) * fall * bursts(s, splash_db, rise_s=0.00089, t60=0.039)
    mid += splash * grains(fizz_colour, per_s=7500, cycles=25, spread_db=3.5)
    spatter = fall * bursts(s, spray_db, rise_s=0.0012, t60=0.087)
    top += spatter * grains(spray_colour, per_s=6400, cycles=58, spread_db=5.0)
    # countless tiny bubbles merge
    wash = from_db(-10.0) * fizz * grains(fizz_colour, per_s=16000, cycles=26, spread_db=2.5)
    thud = from_db(-28.5) * bursts(s, gulp_db(), rise_s=0.02, t60=0.22) * boom
    return low + mid + top + wash + thud


def scene():
    """Strainer, hand and tea sound in the kitchen, over its hush."""
    boom = table_boom()
    tea = stream(boom) + mug_ring() + mug_hum() + plops() + bubbles() + dribbles() + mesh_drops()
    close = strainer(boom) + knocks() + rustle() + tea
    heard = kitchen(close, near_db=-4.5, tail_db=-15.0, t60=0.24, treble_t60=0.19)
    late = np.interp(TIME - 6e-5, TIME, heard[1], left=0)   # the right port is a little further from the mug
    return np.array([heard[0], late]) + room_noise()


def record(dry):
    """The top is cut steeply."""
    return signal.sosfilt(signal.ellip(10, .2, 70, CUTOFF_HZ, fs=SR, output="sos"), dry)


dry = scene()
out = record(dry)
bounce(out)
```